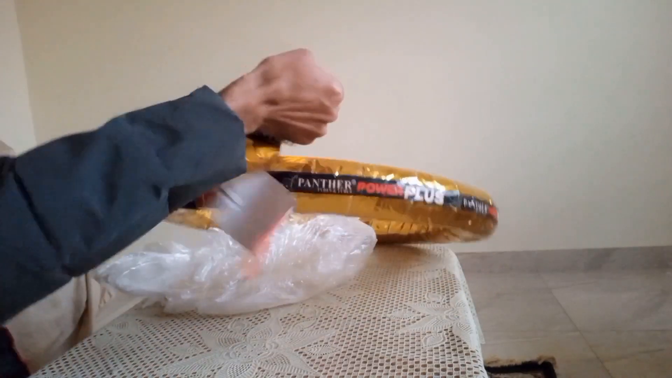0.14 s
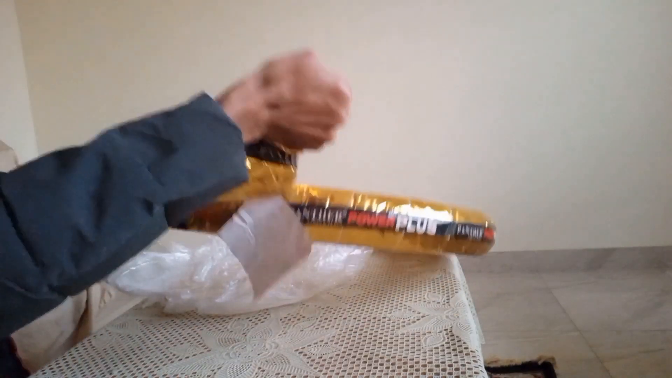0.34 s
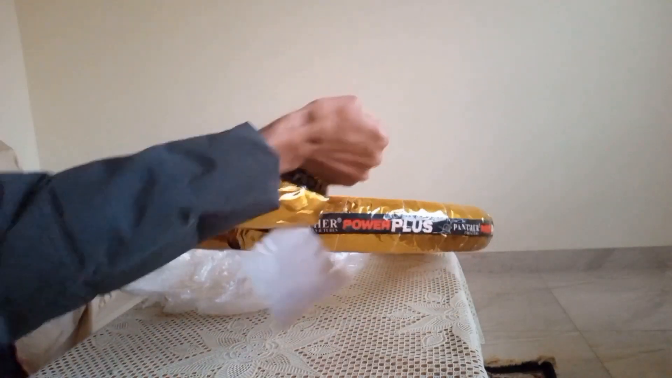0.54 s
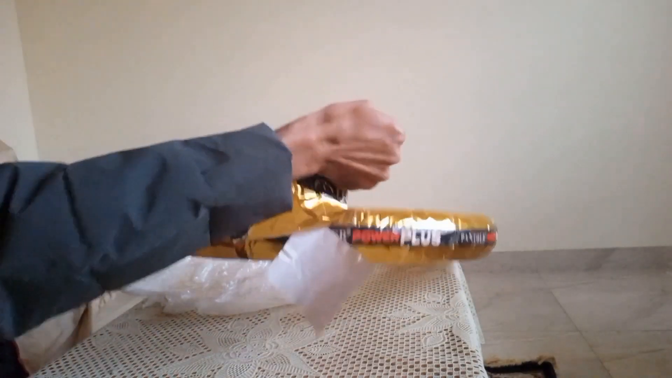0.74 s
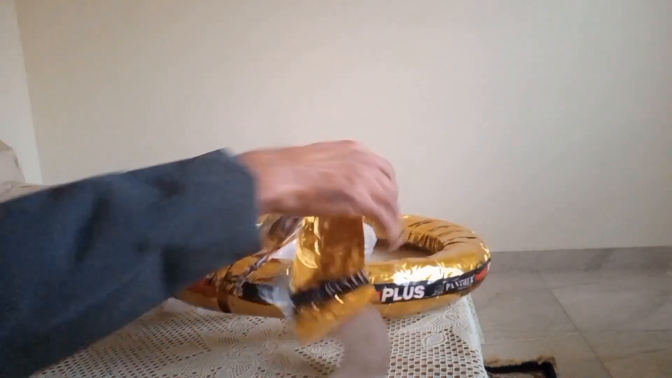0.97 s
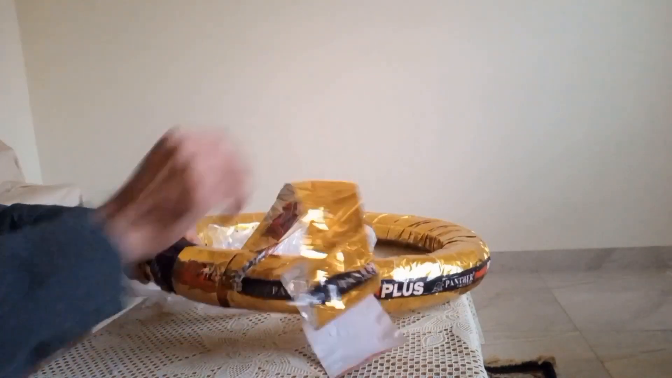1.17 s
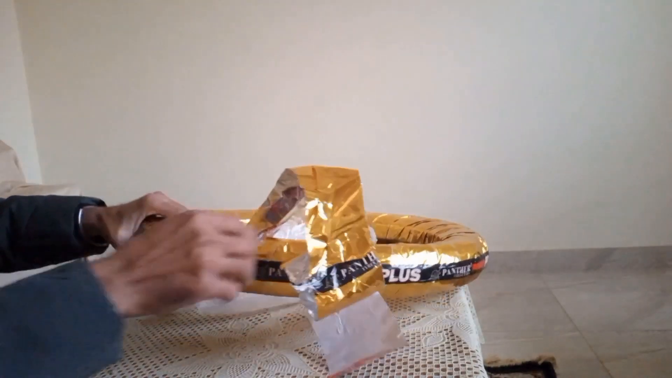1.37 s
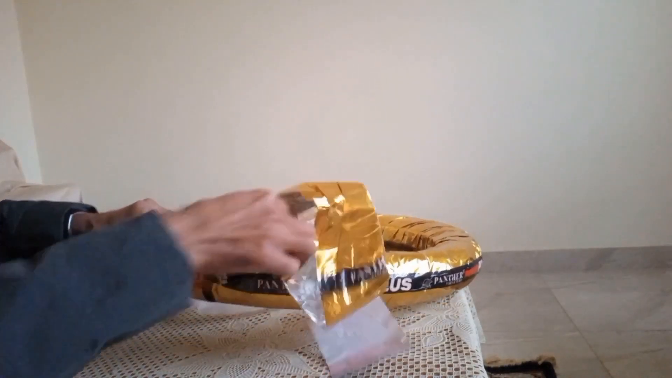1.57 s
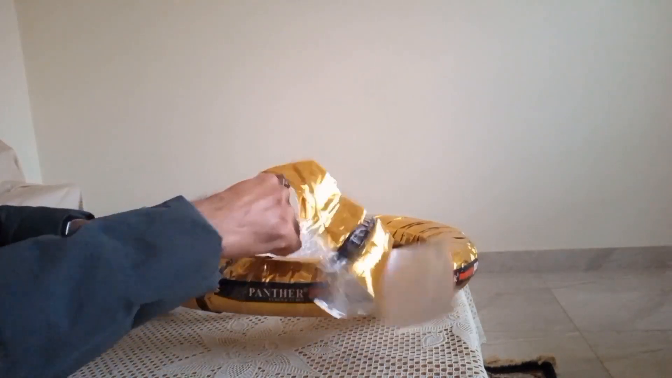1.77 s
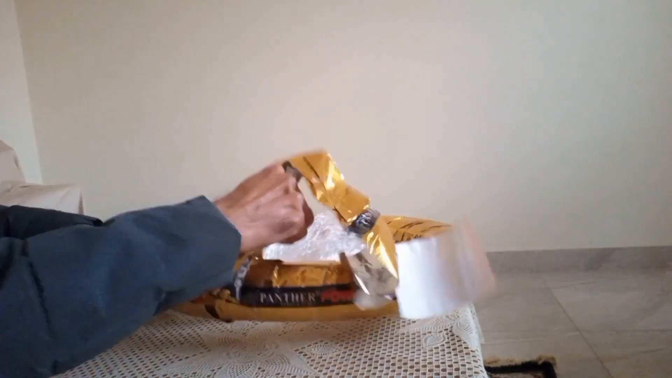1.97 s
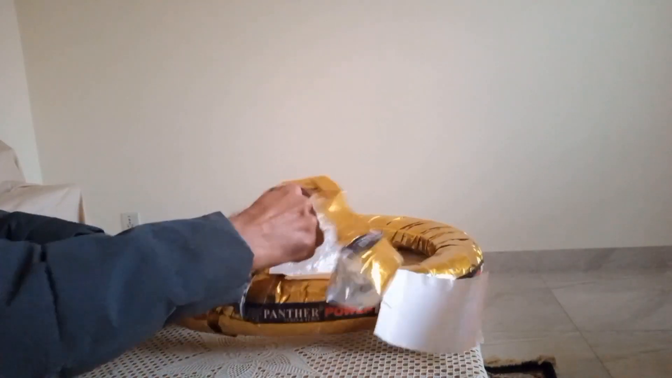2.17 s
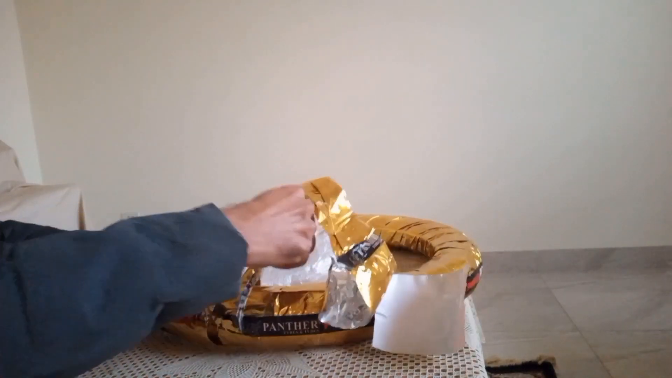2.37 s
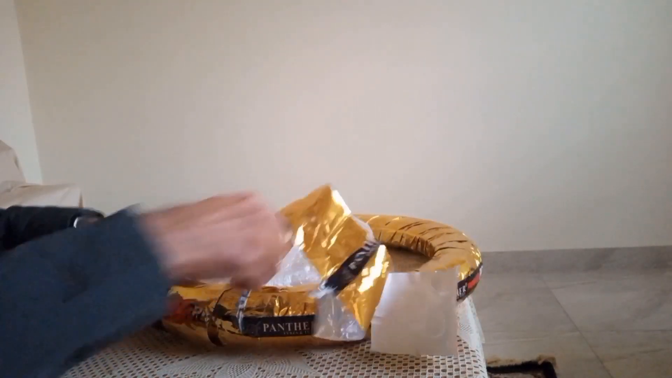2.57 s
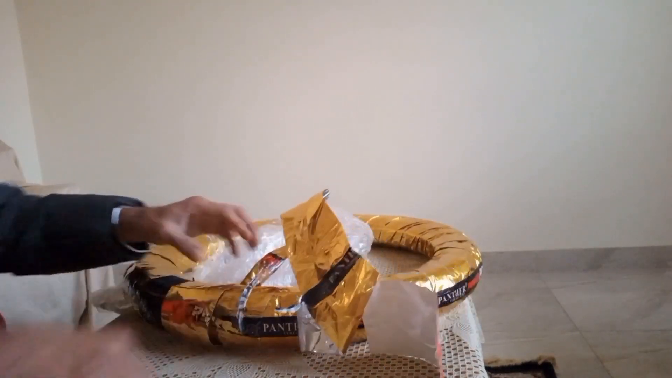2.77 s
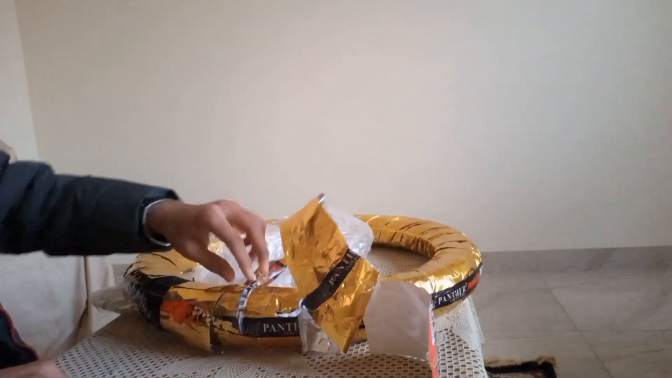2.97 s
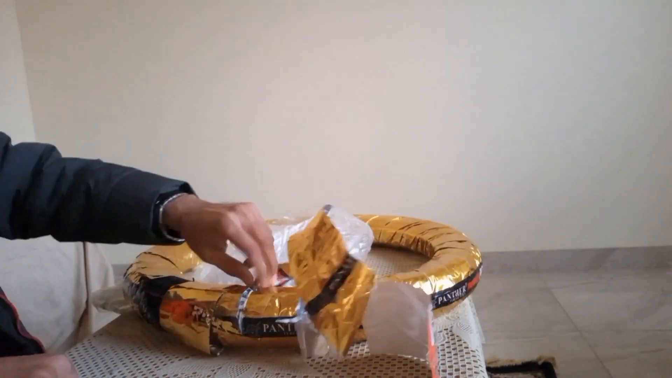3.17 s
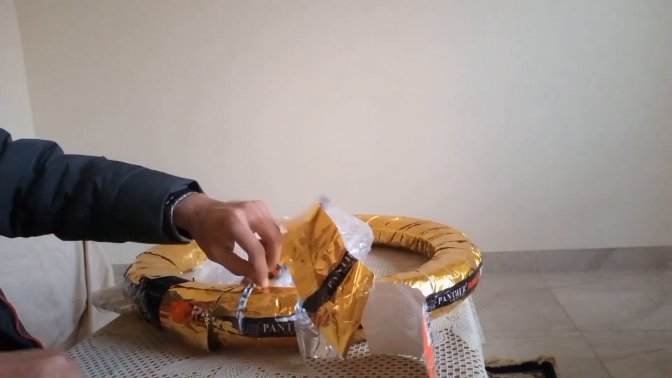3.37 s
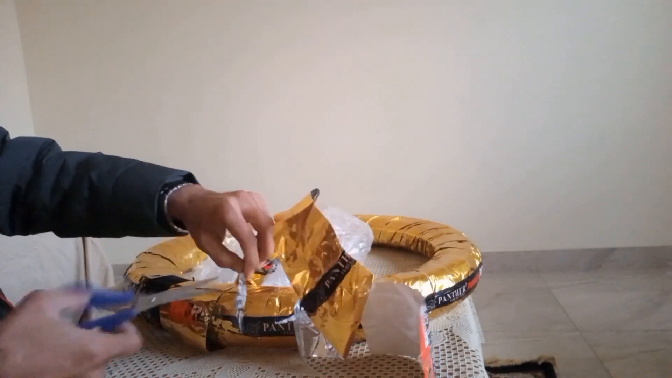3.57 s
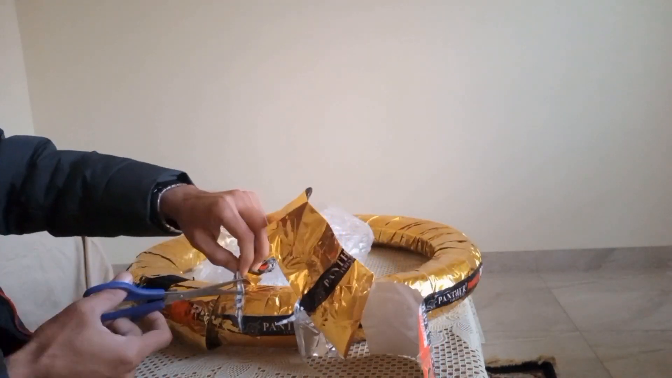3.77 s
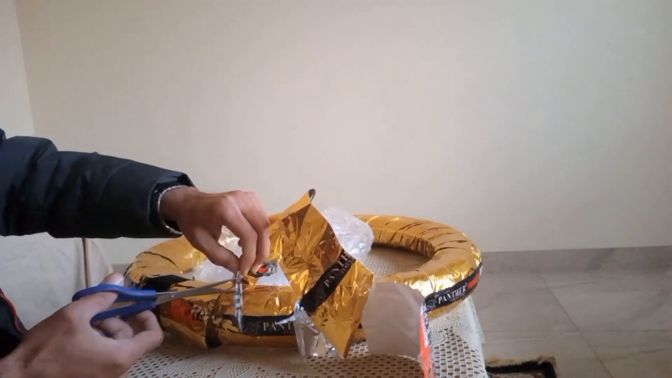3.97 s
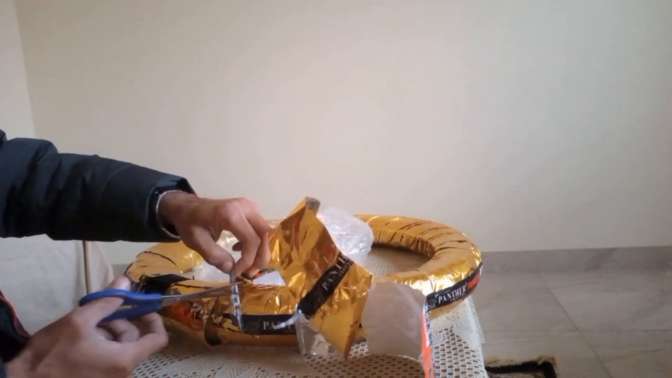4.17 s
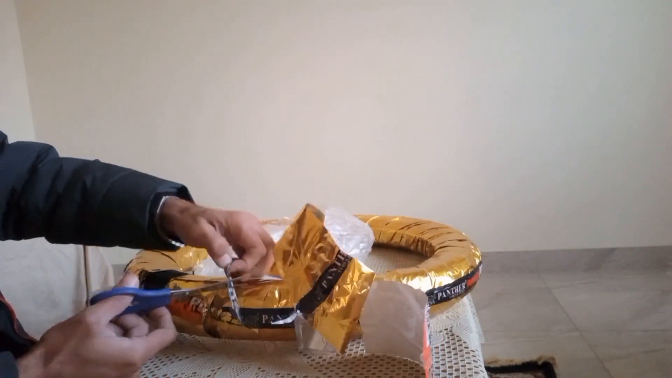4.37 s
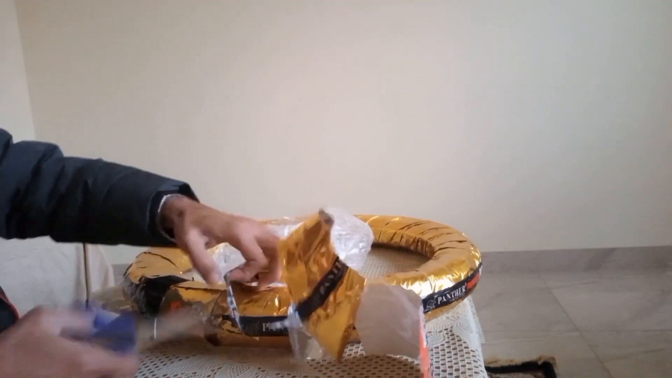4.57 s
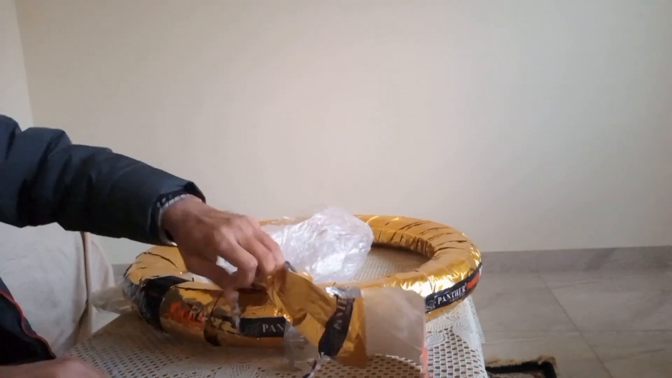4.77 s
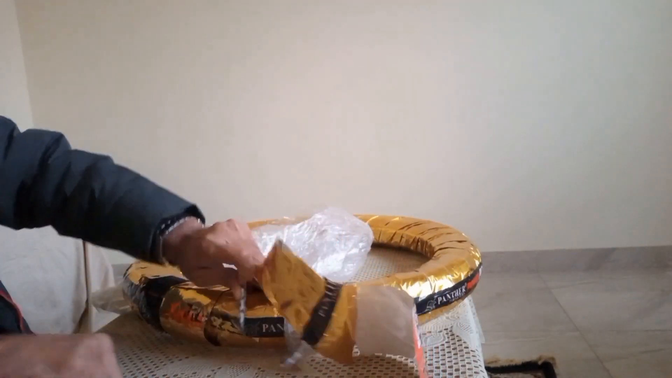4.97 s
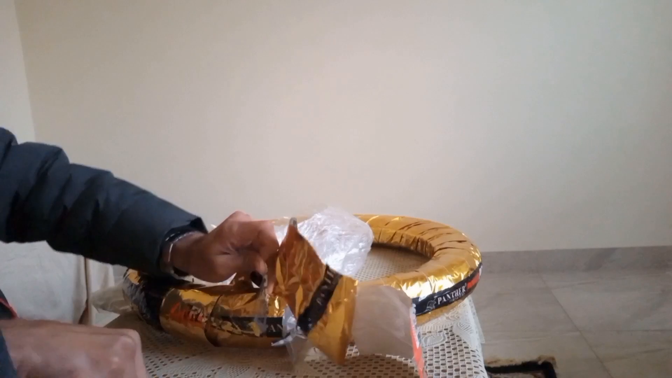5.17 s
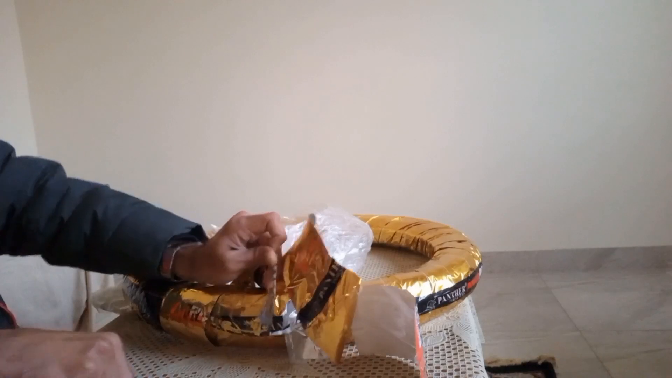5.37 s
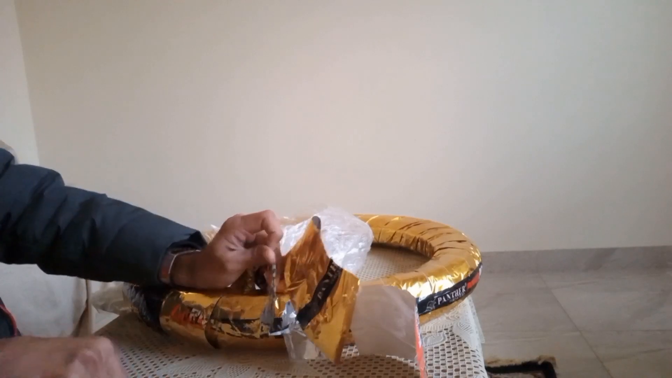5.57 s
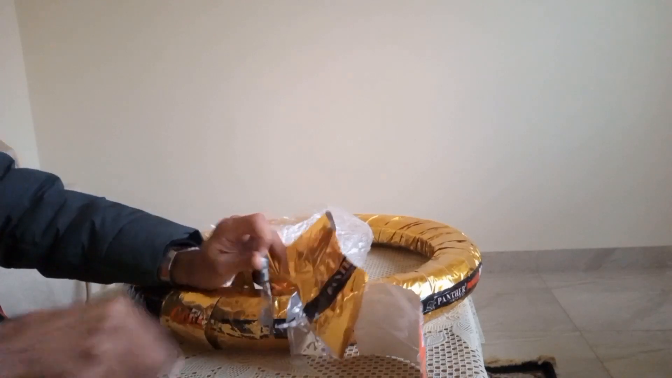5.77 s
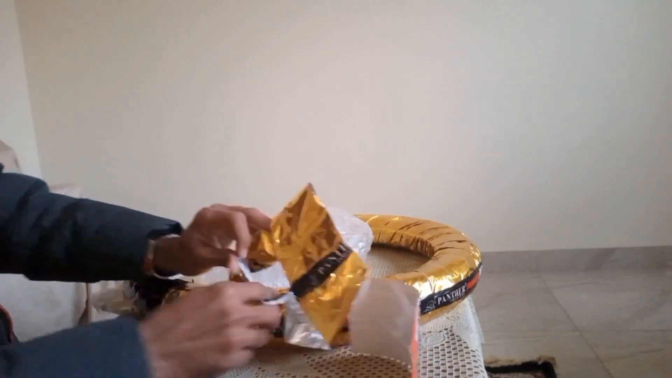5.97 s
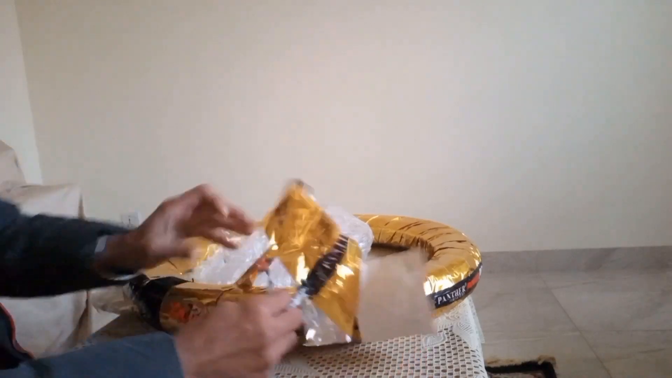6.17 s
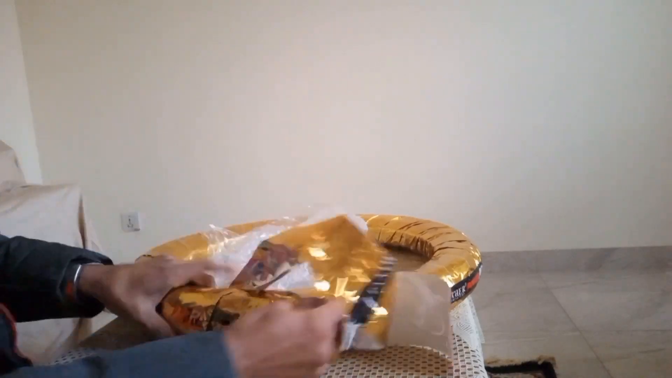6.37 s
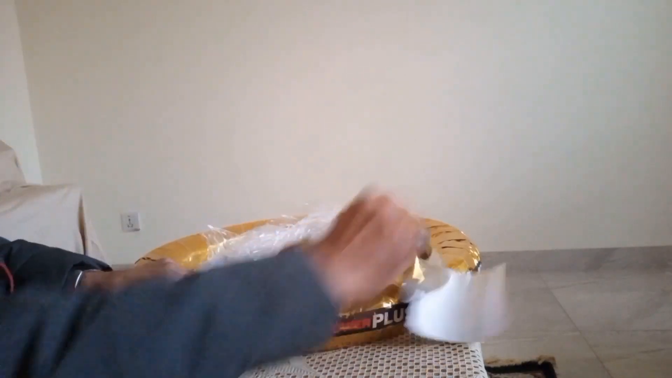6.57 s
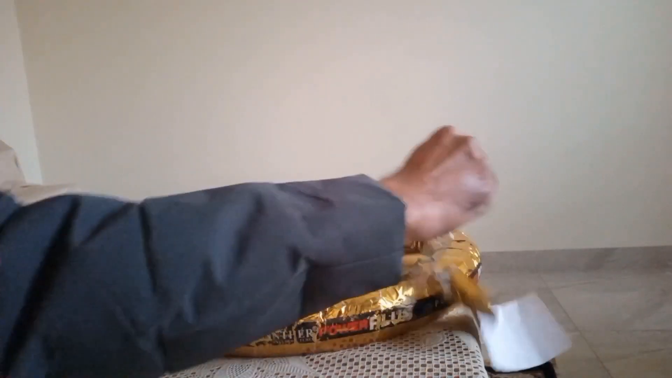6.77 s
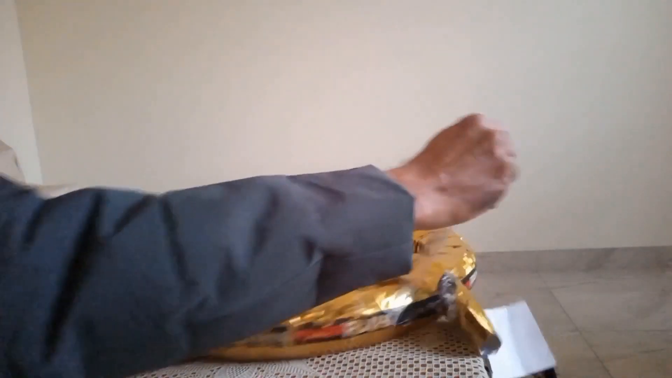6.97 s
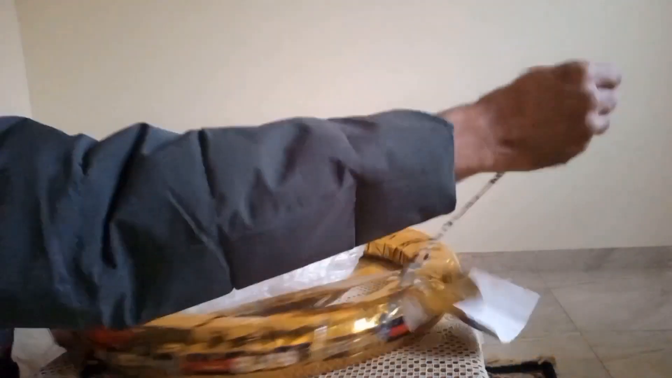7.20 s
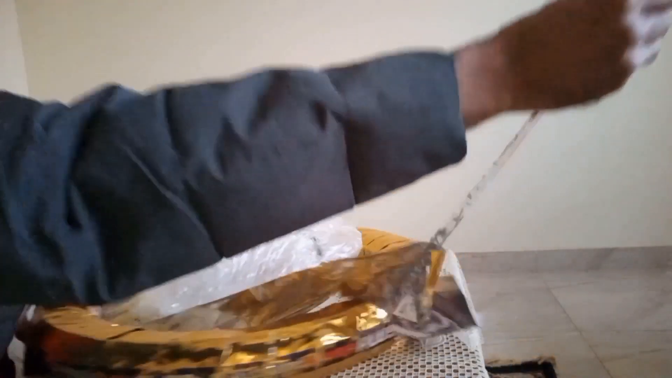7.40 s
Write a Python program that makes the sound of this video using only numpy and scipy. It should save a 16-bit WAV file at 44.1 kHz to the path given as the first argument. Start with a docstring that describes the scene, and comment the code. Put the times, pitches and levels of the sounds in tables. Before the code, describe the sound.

Hands pull foil and plastic film off a tyre on a table in a bare, reverberant room. A sharp rip and crackle open, followed by uneven crinkling and crisp snaps. A quieter stretch of fiddling holds one small scissor click. The crinkling builds again with dull bumps from the tyre and a brief zip of peeling tape, ending in loud rips and pops. The sound is fairly close, in stereo.

```python
"""Unwrapping a tyre in a tiled room

Hands pull foil and plastic film off a tyre at a table. The wrap crinkles by buckling, creases snap
through, taut film pops, and taped film rips away by stick-slip friction; scissors click once.
Underneath, the tyre rubs and bumps dully and a faint low drone comes and goes.
The bare room reverberates after every burst."""
import sys
import numpy as np
from scipy import signal
from scipy.fft import rfft, irfft, next_fast_len
from scipy.io import wavfile
from scipy.ndimage import uniform_filter1d

SR = 44100
rng = np.random.default_rng(int(sys.argv[2]) if len(sys.argv) > 2 else 0)


def wav_out(sig):
    """Save sig, one row per channel (or a flat mono array), as 16-bit PCM at SR to the path in sys.argv[1]."""
    wavfile.write(sys.argv[1], SR, np.round(np.clip(np.atleast_2d(sig).T, -1, 1) * 32767).astype(np.int16))


N = 328104
TIME = np.arange(N) / SR

# Grabs at the wrap: t/s, duration/s, crinkle level/dB, foil fizz/dB and fold flap/dB (both re crinkle)
GRABS = [(0, 0.074, -31, -3, -9.5), (0.102, 0.11, -38.5, -1, -7), (0.236, 0.28, -46, -0.5, -5.5),
         (0.337, 0.0778, -34.5, -1.5, -5), (0.537, 0.14, -46.5, 1, -9.5), (0.756, 0.065, -46, 0.5, -11.5),
         (0.893, 0.14, -47, -0.5, -9.5), (1.022, 0.041, -41.5, -2.5, -8), (1.102, 0.11, -50, -0.5, -7.5),
         (1.261, 0.066, -57.5, -2, -6.5), (1.418, 0.12, -59, -4, -15), (1.54, 0.44, -58, -0.5, -6),
         (1.67, 0.43, -47, -4.5, -6), (1.897, 0.025, -36.5, -7, -10), (2.022, 0.094, -33.5, -2, -6),
         (2.122, 0.032, -32.5, 1, -9), (2.193, 0.12, -56, 4, 2), (2.36, 0.29, -47, -1, -8),
         (2.78, 0.11, -63, -1.5, -7), (2.901, 0.09, -62, 1, 2), (3.056, 0.15, -55.5, 2.5, -11),
         (3.285, 0.15, -55, 2.5, -14), (3.476, 0.043, -53.5, 6.5, -9), (3.558, 0.14, -51, -6, -7),
         (3.702, 0.023, -47.5, 4.5, -12), (3.806, 0.016, -46.5, 0, -10), (3.976, 0.064, -57, 3, -7.5),
         (4.263, 0.061, -53, -3, -9.5), (4.316, 0.13, -47.5, -2, -9.5), (4.484, 0.11, -51, -5, -4),
         (4.596, 0.2, -46.5, -2.5, -4), (4.735, 0.049, -41, 1, -7), (4.819, 0.024, -40, -2, -5),
         (4.911, 0.037, -45.5, 1, -2.5), (4.98, 0.22, -50, 4, -6.5), (5.165, 0.038, -35.5, 1.5, -2),
         (5.214, 0.07, -39.5, 1.5, -10), (5.694, 0.096, -54.5, 3, -3), (5.81, 0.017, -44, -1, -2.5),
         (5.86, 0.035, -45.5, 0.5, -6), (5.933, 0.0072, -42, -0.5, -2), (6.014, 0.112, -54, 3, -4.5),
         (6.105, 0.15, -46.5, 0.5, -11), (6.242, 0.045, -41, -3, -7), (6.353, 0.02, -47.5, 3, 1),
         (6.403, 0.061, -40, -4, -4.5), (6.488, 0.037, -42, -17, -8), (6.554, 0.074, -37.5, 3, -1.5),
         (6.63, 0.037, -26.5, -3.5, -4.5), (6.686, 0.042, -29, 0.5, -18), (6.964, 0.18, -51, 0.5, -9.5),
         (7.095, 0.16, -34.5, -1.5, -4), (7.287, 0.025, -39.5, -7, 4.5), (7.349, 0.12, -33.5, -10, -5)]


def crinkle(film_db=-.5, foil_db=1, hollow_db=-8):
    """Buckling: the same impulses sound in film, foil and large folds, and excite the tyre's cavity."""
    wrap_spectrum = [(200, -4), (400, 0), (560, 2), (800, 0), (1200, 0), (2200, 0), (3300, 1.5), (4400, 0),
                     (7000, -1), (8200, -4), (11500, 1), (15000, 2), (16000, -2)]  # f/Hz, gain/dB
    cavity_modes = [(275, 60, 2), (335, 60, -1), (528, 30, -1), (595, 50, -2), (690, 90, -4)]  # f/Hz, bandwidth/Hz, relative level/dB
    _, _, level, fizz, flap = np.transpose(GRABS)
    per_s = 1500 * np.maximum(effort(level) / amp(-48), .5) ** .7  # a harder grab buckles more patches
    grains = coloured(buckles(per_s), wrap_spectrum)
    film = evened(band(grains, 1444, 6080, order=3)) * effort(level + film_db)
    foil = evened(band(grains, 6460, 15200, order=3)) * effort(level + fizz + foil_db)
    folds = evened(band(grains, 432, 1530, order=3))
    hollow = sum(amp(db) * evened(band(grains.mean(0), hz - width / 2, hz + width / 2))
                 for hz, width, db in cavity_modes)
    return film + foil + (folds + evened(hollow) * amp(hollow_db)) * effort(level + flap)


def buckles(per_s, spread_db=2.5, clump_db=4):
    """A clustered Poisson process: small patches buckle in clumps, each at its own resonance."""
    clumps = amp(clump_db * wander(500))
    onsets = np.flatnonzero(rng.random(N) < per_s * clumps / SR)
    sizes = amp(spread_db * np.minimum(rng.exponential(1, len(onsets)), 4))
    sizes *= rng.choice([-1, 1], len(onsets))
    patches = []
    for hz in np.geomspace(600, 13000, 120):
        ring = unit(band(burst(.00084, apart=.57), hz / 1.35, hz * 1.256))
        patches.append(ring * np.sqrt(hz / 5000) + .88 * unit(burst(.00041, apart=.59)))
    out = np.zeros((2, N))
    for i, size, k in zip(onsets, sizes, rng.integers(0, len(patches), len(onsets))):
        add(out, i / SR, size * patches[k])
    # the hand feeds in work steadily, so a big buckle is paid for by smaller ones around it
    return out / np.sqrt(uniform_filter1d((out ** 2).mean(0), 1500) + 1e-9)


def effort(levels_db, settle_db_per_s=298, ease_db_per_s=6.5, resting_db=-77.5):
    """Incoherent addition: grabs swell, ease and settle, and their powers sum to one gain envelope."""
    power = np.full(N, amp(resting_db) ** 2)
    for (start, length, *_), db in zip(GRABS, levels_db):
        first = max(round(start * SR), 0)
        t = TIME[:min(SR, N - first)]
        attack = np.minimum(t / (.0029 + .08 * length), 1)  # a long grab swells slowly
        eased_db = ease_db_per_s * (np.minimum(t, length) - length / 2)
        settled_db = settle_db_per_s * np.maximum(t - length, 0)
        power[first:first + len(t)] += (attack * amp(db - eased_db - settled_db)) ** 2
    return np.sqrt(power)


def snaps(ring_s=.00044, crack_s=.0003, gather_s=.0005, run_s=.001):
    """Snap-through: a crease yields in five steps; each cracks and rings the patch it frees."""
    # Creases snapping or yielding to the scissors, and a squeak of the peeling tape at 5.418 s: t/s, ring f/Hz,
    # ring level/dB, crack level/dB
    creases = [(0.0119, 6100, -19, -21.5), (0.0154, 5700, -19.5, -27), (0.021, 4520, -24, -30),
               (0.0518, 6430, -26.5, -26), (.083, 6200, -30, -29), (0.198, 5500, -23, -28),
               (.2005, 5050, -31, -30.5), (0.3418, 3170, -32, -31), (0.3496, 2920, -26, -21.5),
               (0.3578, 3200, -21, -15), (0.362, 3600, -21.5, -15.5), (0.3758, 3080, -26, -23),
               (0.4754, 2786, -37, -37), (0.573, 9700, -39, -29.5), (0.6514, 6250, -51, -40),
               (0.7499, 11600, -29.5, -29.5), (0.751, 1093, -41.5, -33), (.9069, 6000, -49, -49),
               (1.0455, 2960, -48, -37), (1.0507, 2800, -43, -34), (1.1341, 2734, -39, -35),
               (1.1442, 6000, -43, -41), (1.188, 4004, -55, -36.5), (1.2993, 1500, -55, -42.5),
               (1.413, 2903, -41.5, -51), (1.6313, 3040, -56, -43), (1.738, 2340, -32, -35),
               (1.791, 5656, -40, -29.5), (1.8375, 2504, -38, -40), (1.8465, 2474, -29.5, -28),
               (1.8611, 2410, -38, -47), (1.9123, 4027, -37, -31.5), (1.9198, 3650, -31, -25),
               (1.9315, 1070, -30.5, -31), (2.0062, 2230, -28.5, -23), (2.0127, 2516, -37, -25),
               (2.0215, 2893, -32, -21.5), (2.025, 3120, -25.5, -25), (2.1174, 3250, -27, -20),
               (2.132, 3600, -21, -24), (2.1488, 3500, -26, -34), (2.332, 5000, -53, -44),
               (2.3881, 3700, -56, -34.5), (2.5068, 5070, -55, -35.5), (2.595, 3566, -34.5, -46),
               (2.608, 5543, -38, -34.5), (3.1032, 6494, -47, -48), (3.1356, 5760, -40, -40.5),
               (3.1913, 6136, -42.5, -49), (3.293, 6100, -47, -53), (3.319, 5960, -55, -49),
               (3.3417, 6000, -46, -50), (3.3539, 6000, -50, -46), (3.3745, 5500, -50, -43.5),
               (3.4154, 9000, -51, -46), (3.425, 5994, -53, -44), (3.4799, 5450, -37.5, -35),
               (3.532, 5350, -39.5, -51), (3.565, 2793, -42, -41), (3.576, 2000, -52, -42),
               (3.5854, 5400, -33.5, -31), (3.6184, 11920, -34.5, -32), (3.6429, 1090, -39, -29),
               (3.708, 6010, -45, -42), (3.7117, 5200, -30, -28.5), (3.74, 5500, -41, -39),
               (3.762, 1540, -39, -34.5), (3.8172, 1790, -50, -38.5), (3.835, 9000, -45, -45),
               (3.8573, 6010, -51, -53), (4.01, 6097, -44, -60.5), (4.1, 4100, -53, -44.5),
               (4.3229, 3344, -44, -35.5), (4.344, 6510, -38, -33.5), (4.365, 4995, -46, -35),
               (4.3875, 4194, -38, -32.5), (4.41, 4000, -44, -34), (4.4442, 835, -42, -34),
               (4.455, 3445, -41, -36), (4.5295, 5430, -40, -36), (4.5763, 9315, -37, -32.5),
               (4.6297, 3654, -34, -36), (4.67, 3540, -42, -47), (4.7212, 3770, -30, -25.5),
               (4.7466, 3550, -35, -44), (4.8533, 3130, -35.5, -29.5), (4.9433, 13150, -37, -31.5),
               (5.012, 6200, -35.5, -36), (5.017, 3970, -41, -39), (5.031, 9000, -38, -42),
               (5.063, 9100, -44, -47), (5.1202, 3900, -34, -27), (5.171, 3500, -31, -25),
               (5.176, 11500, -24, -17.5), (5.1876, 10450, -38, -22.5), (5.205, 12100, -23, -22.5),
               (5.212, 10550, -37, -28), (5.2463, 4020, -32, -26), (5.418, 8500, -36, -44),
               (5.478, 1303, -35.5, -36.5), (5.638, 10700, -31, -32), (5.7077, 5860, -38, -34),
               (5.744, 6154, -43, -35), (5.813, 4000, -45, -49), (5.8248, 3530, -38, -35),
               (5.8345, 3502, -42, -40), (5.894, 3563, -40.5, -40), (5.918, 3520, -42, -43),
               (5.957, 3500, -47, -44), (6.0364, 3161, -35, -36), (6.1593, 6540, -34, -38),
               (6.164, 5990, -39, -29.5), (6.27, 4003, -39, -35), (6.2759, 6430, -31, -31.5),
               (6.2805, 6960, -34, -29), (6.2904, 5002, -48, -42), (6.3792, 3500, -55, -35.5),
               (6.418, 12700, -39, -24), (6.4833, 11090, -33, -19), (6.486, 1490, -30.5, -19.5),
               (6.4894, 9120, -33, -24), (6.5026, 11900, -29, -17), (6.5591, 3794, -18, -15.5),
               (6.5614, 3870, -25, -20), (6.5693, 3150, -28, -15.5), (6.5716, 3150, -31, -17),
               (6.618, 2600, -36, -13), (6.6304, 2760, -27, -17.5), (6.6365, 6000, -31, -26),
               (6.645, 3980, -26, -21), (6.7683, 5680, -25, -18), (7, 11020, -42, -48),
               (7.299, 6050, -27, -22), (7.313, 11600, -23, -23.5), (7.352, 6526, -25, -20)]
    cracks, rings = np.zeros((2, 2, N))
    span = np.sqrt(.004 * SR)  # unit energy to unit rms over 4 ms
    for s, hz, ring_db, crack_db in creases:
        delays = np.append(0, run_s * (rng.exponential(2, 4) - 1)) - gather_s / 2
        sizes = np.append(1, amp(-9 + 2 * rng.standard_normal(4)))
        for delay, size in zip(delays, sizes / np.linalg.norm(sizes)):
            pitch = hz * np.exp(.021 * rng.standard_normal())  # each step frees a different patch
            patch = unit(band(burst(ring_s, rise_s=gather_s), pitch / 1.19, pitch * 1.19))
            edge = unit(band(burst(crack_s, rise_s=gather_s), min(hz / 2, 700), 19400, order=1))
            add(rings, s + delay, span * size * amp(ring_db + 1) * patch)
            add(cracks, s + delay, span * size * amp(crack_db) * edge)
    return cracks, rings


def stick_slip(pulls, trim_db=-1.5, strip_db=4):
    """Stick-slip friction: one tick a slip, so even slips zip and uneven ones shred and catch."""
    tape_spectrum = [(300, -16), (1000, -8), (3000, -3), (3900, -7), (5200, -1.5), (7000, 0), (8200, -3),
                     (11000, 0), (14000, 1), (16000, -1)]  # f/Hz, gain/dB
    out = np.zeros((2, N))
    catches = wander(260)
    sway = evened(uniform_filter1d(wander(4000), 4000))
    impulse = np.eye(2, 512)
    clean = unit(band(impulse, 8000, 18000, order=1) + band(impulse, 10000, 16000, order=1))
    for times, *curves in pulls:
        now = times[0]
        while now < times[-1]:
            per_s, db, rough, ring_hz = (np.interp(now, times, curve) for curve in curves)
            i = min(int(now * SR), N - 1)
            frayed = unit(burst(.00032 + .0022 * rough))  # a ragged slip lasts longer
            db += rough * (3 * rng.standard_normal() + 3 * catches[i] + 7)
            strip = unit(band(frayed, ring_hz / 1.75, ring_hz * 1.42, order=1)) * rough * amp(strip_db)
            shred = (amp(-14) + 2 * rough) * frayed
            tick = unit(clean + shred + strip) * amp(db + trim_db) * np.sqrt(SR / per_s)
            add(out, now, tick)
            # comb filtering: the reflection off the tyre shifts as the torn strip sways
            echo_s = .00063 * np.exp(2 * rough ** 2 * (1 + .5 * sway[i]))
            add(out, now + round(echo_s * SR) / SR, -min(.25 + .5 * rough, .8) * tick)
            now += np.exp(rough * rng.standard_normal() - rough ** 2 / 2) / per_s
    return coloured(out, tape_spectrum)


def tears(attack_s=.005, sag=.25):
    """Fracture at steady speed: the resonance of the freed strip falls as it lengthens."""
    # Ragged tears: t/s, duration/s, slip rate/Hz, base level/dB, unevenness (0-1), strip f/Hz
    runs = [(.009, 0.027, 2560, -22, 0.53, 5500), (0.037, 0.042, 2080, -27.5, 0.49, 4760),
            (2.125, .012, 2400, -24, 0.47, 3680), (2.147, .008, 2430, -27, .45, 3590),
            (6.712, 0.0093, 2360, -16, 0.39, 6200), (6.723, .042, 2400, -18.5, .4, 6160),
            (7.091, .044, 1080, -25.5, 0.51, 7100), (7.138, 0.023, 1460, -22.5, .55, 2399),
            (7.17, .046, 800, -26.5, .55, 5560), (7.233, .028, 900, -23.5, .5, 10420),
            (7.351, .011, 1600, -26, 0.49, 4500), (7.392, 0.07, 920, -25.5, 0.57, 5230)]
    pulls = []
    for start, length, per_s, db, uneven, ring_hz in runs:
        edge = min(attack_s, length / 2)
        t = np.array([0, edge, length, length + edge / 2])
        levels = db + np.array([-6, 0, 0, -6])
        pitches = ring_hz * (1 - sag * t / length)
        pulls.append((start + t, np.full(4, per_s), levels, np.full(4, uneven), pitches))
    return stick_slip(pulls)


def peel(tighten_db_per_s=26, ring_hz=(8500, 14000)):
    """Peeling adhesive: power follows the slip rate, and power and pitch rise with the tension."""
    # Tape that races, nearly stalls and races again: t/s, slip rate/Hz, unevenness (0-1)
    course = [(5.398, 1100, .45), (5.415, 1000, .42), (5.448, 800, .36), (5.463, 420, .36),
              (5.478, 1250, .05), (5.502, 1600, .08), (5.509, 340, .02), (5.565, 215, .06),
              (5.586, 280, .1), (5.602, 1030, .06), (5.624, 900, .05), (5.633, 250, .1)]
    s, per_s, uneven = np.transpose(course)
    db = -27.5 + 10 * np.log10(per_s / 1260) + tighten_db_per_s * (s - s[0])
    db[0] -= 14  # the peel eases in
    return stick_slip([(s, per_s, db, uneven, np.interp(s, s[[0, -1]], ring_hz))])


def pops(rise_s=.0021, sag=.037, overtone_ratio=1.9):
    """Membrane vibration: taut film lets go with a crunch and a note that sags as it slackens."""
    spans = [(1.092, 770, -37, .025), (1.862, 585, -33.5, 0.039), (2.039, 1020, -31, 0.077),
             (2.91, 700.2, -51, 0.088), (4.762, 636.7, -34.5, 0.043), (6.559, 558, -24.5, 0.04),
             (6.569, 1520, -27, .06), (6.63, 651, -26, 0.071), (6.636, 1127, -23, 0.052),
             (6.642, 547.6, -26.5, 0.053), (6.67, 524, -28, .07), (6.674, 1684, -23, .07),
             (6.679, 334, -27.5, 0.053), (6.686, 543, -23.5, 0.049), (6.752, 787.6, -34, 0.097),
             (6.768, 900.4, -33.5, 0.082), (7.116, 726, -33, 0.098), (7.138, 729.3, -32, .12),
             (7.145, 1750, -29.5, 0.056), (7.18, 230, -36, 0.067), (7.252, 502.5, -30, 0.12),
             (7.269, 945, -28, 0.075), (7.297, 871.7, -23, 0.032), (7.356, 204, -33, 0.065)]  # Spans of film: t/s, f/Hz, level/dB, T60/s
    out, t = np.zeros((2, N)), TIME[:SR // 5]
    for s, hz, db, t60 in spans:
        pitch = hz * (1 - sag * np.minimum(t / t60, 1))
        phase = 2 * np.pi * (np.cumsum(pitch) / SR + rng.random())
        note = np.sqrt(2) * (np.sin(phase) + amp(-10) * np.sin(overtone_ratio * phase))
        crunch = amp(-6) * evened(band(rng.standard_normal((2, len(t))), hz / 1.4, hz * 3.7))
        add(out, s, (note + crunch) * np.minimum(t / rise_s, 1) * amp(db - 60 * t / t60))
    return out


def snip(at_s=4.2503, hz=5000, db=-37):
    """Impact of steel scissor blades: three heavily damped partials make one dry click."""
    t = TIME[:400] - .0007
    phase = 2 * np.pi * hz * t
    click = np.exp(-abs(t) / .00028) * (np.cos(phase) + .4 * np.sin(1.3 * phase))
    click += np.exp(-abs(t) / .0001) * np.sin(2.1 * phase)
    out = np.zeros((2, N))
    add(out, at_s, unit(np.array([click, np.roll(click, 1)])) * amp(db) * np.sqrt(.004 * SR))
    return out


def tyre(rise_s=.0084):
    """Friction and damped impact: rubber rubs on the wrap as the large folds move, and bumps dully."""
    rub_spectrum = [(40, -30), (75, -6), (110, -5), (160, -9), (215, -6), (280, 1), (340, 0), (420, -3),
                    (540, -2), (700, -7), (1000, -35), (2000, -70)]  # f/Hz, gain/dB
    bumps = [(.02, -45, 327, 0.91), (0.029, -52, 80, 0.27), (.37, -50, 85, 0.14), (.2, -46, 325, 0.44),
             (.36, -41, 258, 0.18), (1.08, -57, 140.9, .3), (2.129, -46, 430, 0.35), (2.92, -58, 139, 0.46),
             (2.945, -52.5, 264.9, 0.38), (4.62, -48, 520.4, 0.3), (4.735, -48, 175.3, 0.23),
             (4.76, -39, 599.6, 0.13), (4.95, -44, 589.8, 0.3), (4.955, -49, 176, .25),
             (5.179, -43, 115, 0.21), (5.185, -32, 317, 0.22), (5.23, -37.5, 299.9, 0.25),
             (5.309, -39.5, 288.3, 0.35), (6.369, -32.5, 483, 0.049), (6.639, -39, 110, 0.17),
             (6.726, -34, 85, 0.085), (6.772, -42, 76.04, 0.052), (7.16, -37.5, 190, 0.18),
             (7.25, -35, 84.95, 0.1), (7.28, -40, 166, .2), (7.352, -41, 178, 0.25)]  # t/s, level/dB, f/Hz, T60/s
    _, _, level, _, flap = np.transpose(GRABS)
    rubbing = effort(-59.5 + .75 * (level + flap + 53), settle_db_per_s=125)
    strokes = amp(.77 * wander(900))
    out = evened(coloured(diffuse_noise(N), rub_spectrum)) * strokes * rubbing
    t = TIME[:SR // 2]
    for s, db, hz, t60 in bumps:
        body = evened(band(diffuse_noise(len(t)), hz / 1.45, hz * 1.21, order=3))
        add(out, s, body * amp(db - 60 * t / t60) * np.minimum(t / rise_s, 1))
    return out


def room(x, tail_db=-5):
    """Reverberation: early reflections off table and wall, then a tail that dies first in the treble."""
    decay_times = [(100, 0.87), (400, 0.655), (1000, 0.81), (3000, 0.67), (7000, 0.47), (15000, 0.3)]  # f/Hz, T60/s
    hz, t, spectrum = signal.stft(diffuse_noise(SR), SR, nperseg=256)
    fade_db = -60 * t / read(decay_times, hz)[:, None]
    tail = signal.istft(spectrum * amp(fade_db), SR, nperseg=256)[1]
    tail *= np.clip((TIME[:tail.shape[1]] - .004) / .0078, 0, 1)
    response = amp(tail_db) * unit(tail)
    for delay_s, size in [(.0013, .64), (.0032, 1), (.0096, .57), (.0172, .56)]:
        add(response, delay_s, amp(-15) * size * unit(burst(.0001)))
    return signal.fftconvolve(x, response, axes=1)[:, :N]


def drone(trim_db=-3, waver_hz=22):
    """Random modulation of frequency and amplitude roughens a low tone that swells and fades."""
    swells = [(3.075, 0.18, 99.8, -62), (3.261, .11, 98.15, -59), (3.42, 0.34, 99.9, -58),
              (3.78, 0.34, 112.3, -57), (4.39, 0.16, 110.5, -60), (4.62, .22, 110.1, -57),
              (4.87, 0.29, 115, -48.5), (5.36, 0.34, 115.3, -59)]  # t/s, duration/s, f/Hz, relative level/dB
    lowpass = signal.butter(2, waver_hz, fs=SR, output="sos")
    waver = evened(signal.sosfilt(lowpass, rng.standard_normal(N)))
    starts, lengths, pitches, _ = np.transpose(swells)
    hz = np.interp(TIME, starts + lengths / 2, pitches) * (1 + .1 * waver)
    tone = np.sin(2 * np.pi * np.cumsum(hz) / SR) * (1 + .5 * waver[::-1])
    arches = sum(amp(db) * np.sin(np.pi * np.clip((TIME - s) / length, 0, 1))
                 for s, length, _, db in swells)
    return evened(tone) * arches * amp(trim_db)


def still_air(db=-72):
    """Ambient noise: a steady diffuse field, strongest in the bass."""
    ambient_spectrum = [(25, -26), (60, -14), (100, 18), (200, 6), (500, -17), (1500, -24), (5000, -37),
                        (16000, -40.5)]  # f/Hz, gain/dB
    return amp(db) * evened(coloured(diffuse_noise(N), ambient_spectrum))


def diffuse_noise(length):
    """Spatial coherence: a diffuse field at two points is alike in the bass, apart in the treble."""
    coherence = [(30, 0.12), (70, 0.58), (130, 0.97), (300, 0.92), (700, 0.78), (1500, 0.07), (4000, 0),
                 (15000, 0.3)]  # f/Hz, correlation (0-1)
    size = next_fast_len(length)
    a, b = rfft(rng.standard_normal((2, length)), size)
    same = read(coherence, np.fft.rfftfreq(size, 1 / SR))
    return irfft(np.array([a, same * a + np.sqrt(1 - same ** 2) * b]), size)[:, :length]


def burst(decay_s, apart=.13, rise_s=0):
    """Two-stage decay: a stereo noise transient dies at once and leaves a faint shiver."""
    t = TIME[:512]
    shared, left, right = rng.standard_normal((3, len(t)))
    lag = rng.integers(-3, 4)  # arrival difference in samples: each burst has its own direction
    pair = np.array([shared + apart * left, np.roll(shared, lag) + apart * right])
    rise = np.minimum((t + 1 / SR) / (rise_s + 1 / SR), 1) ** 2
    return pair * rise * (np.exp(-t / decay_s) + .16 * np.exp(-t / (5 * decay_s)))


def coloured(x, points):
    """Minimum-phase filtering by a spectrum table: clicks keep their sharp front."""
    log_gain = np.log(amp(read(points, abs(np.fft.fftfreq(2048, 1 / SR)))))
    taps = np.fft.ifft(np.exp(np.conj(signal.hilbert(log_gain)))).real
    return signal.oaconvolve(x, taps[None], axes=1)[:, :x.shape[1]]


def band(x, lo_hz, hi_hz, order=2):
    """Causal band-pass."""
    edges = [lo_hz, min(hi_hz, SR / 2 - 1000)]
    return signal.sosfilt(signal.butter(order, edges, "band", fs=SR, output="sos"), x)


def wander(samples):
    """Slow fluctuation: a moving average of noise, at rms 1."""
    return evened(uniform_filter1d(rng.standard_normal(N), samples))


def read(points, hz):
    """Interpolates a table over log frequency."""
    f, value = np.transpose(points)
    return np.interp(np.log(hz + 1), np.log(f), value)


def amp(db):
    """Decibels to gain."""
    return 10 ** (np.asarray(db) / 20)


def evened(x):
    """Scales to rms 1."""
    return x / np.sqrt(np.mean(x ** 2) + 1e-20)


def unit(x):
    """Scales a stereo sound to mean energy 1 a channel."""
    return x / np.sqrt(np.sum(x ** 2) / 2 + 1e-20)


def add(mix, s, sound):
    """Superposes a stereo sound at s seconds."""
    part = mix[:, max(round(s * SR), 0):][:, :sound.shape[1]]
    part += sound[:, :part.shape[1]]


def scene():
    """Directivity: sources that beam their sound excite the room less than those that spread it."""
    cracks, rings = snaps()
    wide = cracks + tears() + crinkle() + tyre()
    beamed = rings + peel() + pops() + snip()
    echo = room(wide + amp(-8) * beamed)
    balance = amp([[.5], [-.5]])
    return (wide + beamed + echo + still_air() + drone()) * balance


def record(dry):
    """Clipping at full scale, then a low-pass band limit."""
    taps = signal.firwin(255, 15650, window=("kaiser", 8), fs=SR)
    return signal.oaconvolve(np.clip(dry, -1, 1), taps[None], "same")


dry = scene()
out = record(dry)
wav_out(out)
```